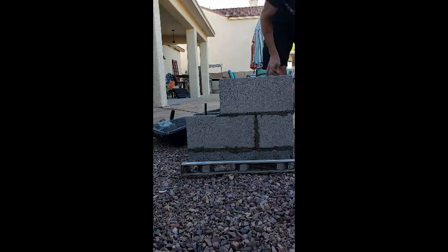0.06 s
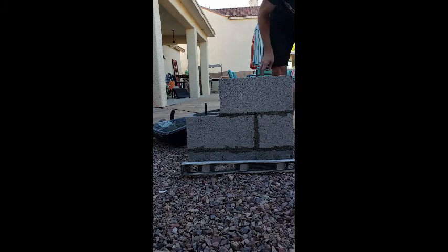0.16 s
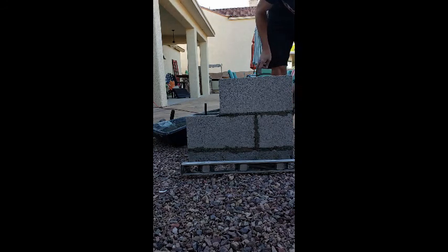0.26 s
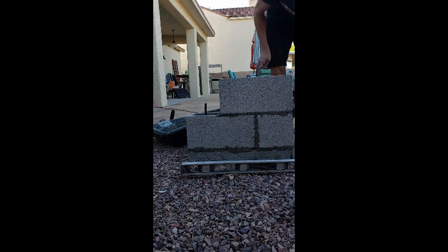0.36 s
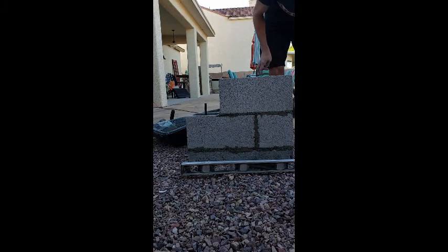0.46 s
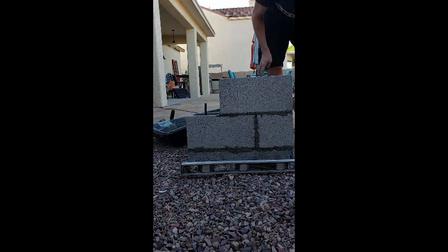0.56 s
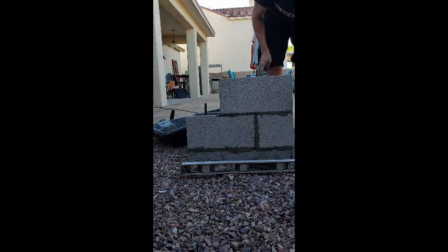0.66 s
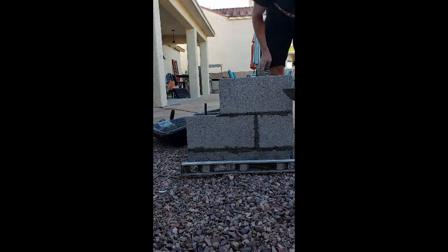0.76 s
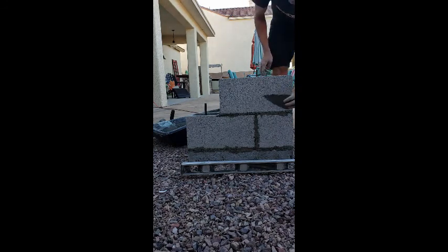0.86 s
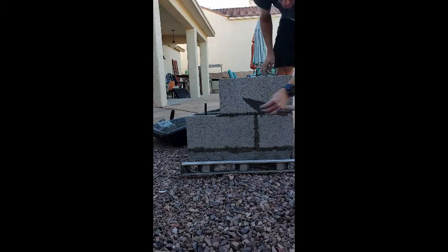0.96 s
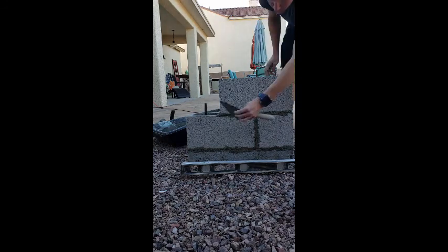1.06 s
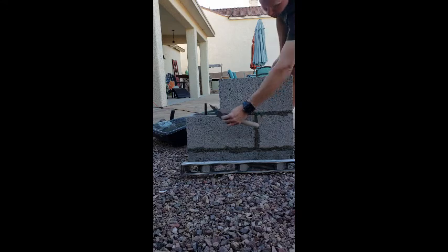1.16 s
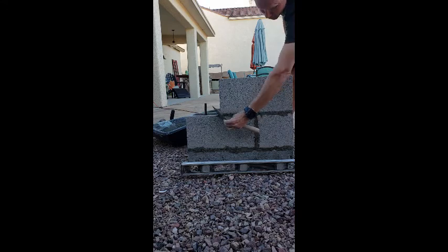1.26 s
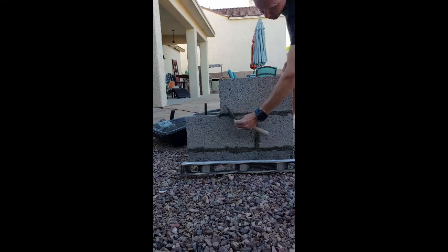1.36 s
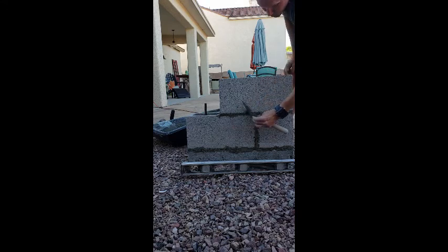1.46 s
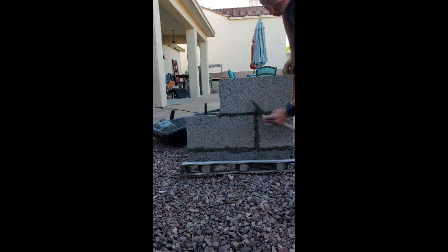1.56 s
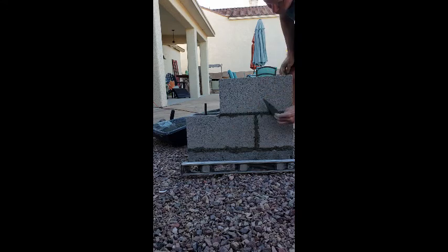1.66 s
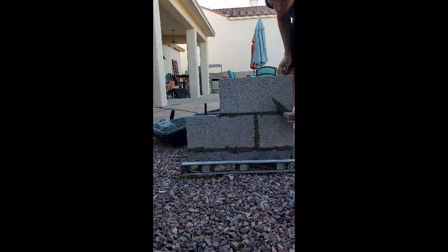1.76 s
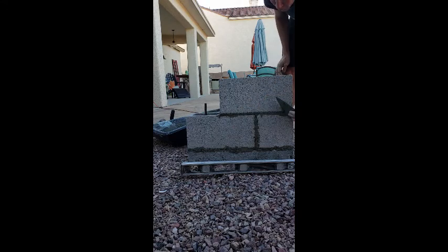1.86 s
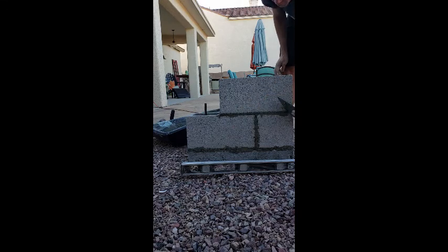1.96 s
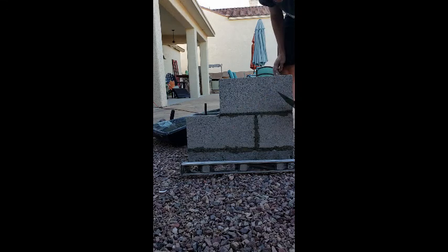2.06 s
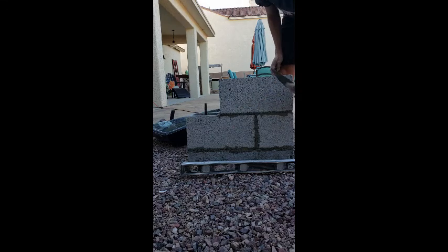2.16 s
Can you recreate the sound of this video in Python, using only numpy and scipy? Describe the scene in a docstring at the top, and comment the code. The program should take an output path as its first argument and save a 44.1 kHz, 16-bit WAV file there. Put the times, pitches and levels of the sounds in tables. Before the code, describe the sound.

A steel trowel rasps twice along gritty mortar between hollow concrete blocks in a quiet yard

```python
"""In a yard, a steel trowel is drawn twice along a mortar joint in a low wall of hollow concrete blocks.
Sand grains rasp under the blade: random clicks and hiss, bunched by stick-slip, drive its resonances.
Where the blade digs in, it judders and coarse slips ring the hollow blocks; decaying noise bursts make
the knocks of the blade and the ticks of mortar crumbs between the strokes.
The house walls return a short echo, as decaying noise, over faint outdoor air and a hum of two sines."""
import sys
import numpy as np
from scipy import signal
from scipy.fft import rfft, irfft
from scipy.io import wavfile

SR = 44100
rng = np.random.default_rng(int(sys.argv[2]) if len(sys.argv) > 2 else 0)


def waveform_to_disk(signal):
    """Save audio, clipped to [-1, 1], as 16-bit WAV at the path in sys.argv[1]."""
    frames = np.transpose(np.atleast_2d(signal))
    scaled = np.clip(frames, -1, 1) * 32767
    samples = np.round(scaled).astype(np.int16)
    wavfile.write(sys.argv[1], SR, samples)


N = 99225
TIME = np.arange(N) / SR
SIZE = 2 ** 17  # FFT length, longer than the scene
HZ = np.fft.rfftfreq(SIZE, 1 / SR)

# short pushes of the first stroke: start t/s, length t/s, level/dB, swell over the push/dB,
# pitch of the flexed blade f/Hz
FIRST_PUSHES = [(0.161,0.0091,-36,4,2350),(0.175,0.04,-36.5,9,2517),(0.221,0.061,-28.5,-1,2482),(0.284,0.0489,-29.5,-10.5,2399),(0.346,0.0206,-34.5,3.5,2184),(0.373,0.0147,-27,-1.5,2325),(0.391,0.0295,-27,-2.5,2494),(0.438,0.0161,-29,2,2420),(0.461,0.0145,-31,4.5,2476),(0.477,0.037,-29,-4,2436),(0.523,0.03347,-21,-2,2495),(0.584,0.035,-21,2.5,2476)]
# the blade knocks or catches on a coarse grain: t/s, level/dB, decay time constant/s
CATCHES = [(.1245,-30.5,0.01726),(.289,-22.5,0.003),(.4805,-15,0.00325),(.9085,-38,0.00395),(1.558,-19,0.00426),(1.591,-17.5,0.0039),(1.612,-17.5,0.0049),(1.739,-25.5,0.0038),(1.75,-21.5,0.00114),(1.811,-21,0.00395),(1.861,-24.5,0.00546),(2.005,-31,0.0054),(2.026,-36.5,0.0057)]
# likeness of left and right under the blade: f/Hz, correlation (0-1)
RASP_ALIKE = [(1300,1),(2400,0.786),(5000,0.515)]
# left minus right in the first and second stroke: f/Hz, level difference/dB
FIRST_SIDE = [(950,-1),(1800,-1.5),(2450,-5),(4300,0),(5300,-2.5),(7200,3),(9500,0.15),(12300,-8),(15500,1)]
SECOND_SIDE = [(1100,2),(2600,-2.5),(4100,1),(5000,-1),(7500,5),(10000,2),(12000,-5.5),(15500,2)]

SECOND_TURN_S = (1.33, 1.439, 1.58, 1.76)  # when the second stroke reaches each colour
DIG_SAND = dict(per_s=1500, spread_db=1.88, hiss_share=0.287, slip_db=0.963, slip_hz=118)
LEFT_LEAD_S = .00007


def rasp():
    """Friction noise: sand under the steel in two firm strokes and a light brush between them."""
    return first_stroke() + second_stroke()


def first_stroke():
    """Pressure-modulated friction: short pushes on fine sand, then a light brush of the blade."""
    # colour of the rasp early and late in the stroke: f/Hz, relative level/dB
    early_colour = [(100,-21.5),(330,-8),(520,-8.5),(730,-14),(940,1),(1200,-21),(1450,-5.5),(1950,-6.5),(2700,-4.5),(3400,-0.5),(3750,-6.5),(5300,-4),(6200,-9.5),(7200,-4),(8800,-12.5),(12600,1),(14200,-1),(16000,-15)]
    late_colour = [(100,-25),(400,-8),(1400,-2),(2000,-7),(3100,-7.5),(3700,-5.5),(5000,-3),(6100,-9),(7400,-5.5),(8600,-8),(10500,-9),(12000,4),(13300,0),(16000,-13)]
    # light brush between the strokes: t/s, level/dB
    brush_level = [(.82,-64),(.885,-51.5),(.91,-40.5),(.935,-58),(.975,-52),(1.02,-65.5)]
    # colour of the brush: f/Hz, relative level/dB
    brush_colour = [(530,-27.5),(900,-3.5),(3400,-3),(8550,-19),(12900,-8),(16000,-21)]
    grit = sand(per_s=8000, spread_db=1.85, hiss_share=0.495, slip_db=1.49, slip_hz=590)
    drag = travel(grit * pushes(FIRST_PUSHES), (0.4137, 0.526), [early_colour, late_colour])
    brush_grit = sand(per_s=760, spread_db=2.91, hiss_share=0.305, slip_db=2.2, slip_hz=170)
    brush = colour(brush_grit * level(brush_level), brush_colour)
    return pair(flex(drag) + brush, RASP_ALIKE, FIRST_SIDE, LEFT_LEAD_S)


def second_stroke():
    """Sustained friction: one pressure curve drives fine sand and resonant coarse grit alike."""
    # level of the long stroke: t/s, level/dB
    stroke_level = [(1.25,-52),(1.35,-31),(1.45,-25.5),(1.53,-25.5),(1.605,-22),(1.635,-24),(1.77,-24.5),(1.85,-31),(1.89,-38.5),(2.0,-43),(2.05,-65.5)]
    # stutter as the pressure eases: start t/s, length t/s, level/dB, swell over the push/dB
    stutter = [(1.68,0.0108,-27.5,-3),(1.771,0.0051,-24,0.5),(1.858,0.00794,-22.5,1.5),(1.922,0.0123,-31,-5.5),(1.96,0.01015,-26.5,-4.5),(1.987,0.0097,-31.5,-4.5)]
    # colour of the rasp at its start, early and late: f/Hz, relative level/dB
    start_colour = [(100,-17),(950,7),(1130,5),(1310,13),(1700,5),(2400,-6),(3350,-1),(10000,-9.5),(12800,-6.5),(16000,-5.5)]
    early_colour = [(100,-28.5),(350,-14.5),(560,-2),(690,-14),(810,3),(1000,1),(1160,-8),(1310,5),(1600,-1.5),(2120,-6.5),(2700,0),(3350,1.5),(3950,-4),(4120,1.5),(4420,-6.5),(5080,2),(5650,-9.5),(7000,-2.5),(10200,-13),(12500,0.5),(16000,-10.5)]
    late_colour = [(100,-17.5),(330,-6),(520,1.5),(650,-21),(810,-2.5),(990,0),(1170,-4),(1380,6.5),(1650,-7.5),(2150,-6),(2750,5.5),(3350,1.5),(3830,-5),(4250,2),(5200,-1),(5750,-17),(7300,2),(9700,-11),(11800,8),(15000,2.5),(16000,-1)]
    pressure = np.hypot(level(stroke_level), pushes(stutter))
    fine = sand(per_s=6000, spread_db=1.17, hiss_share=0.455, slip_db=1.76, slip_hz=141.5)
    coarse = sand(per_s=400, spread_db=2.8, hiss_share=0.1, slip_db=3.8, slip_hz=66.6)
    drag = fine * pressure + grind(coarse * pressure)
    colours = [start_colour, early_colour, early_colour, late_colour]
    return pair(travel(drag, SECOND_TURN_S, colours), RASP_ALIKE, SECOND_SIDE, lead_s=.00004)


def sand(per_s, spread_db, hiss_share, slip_db, slip_hz):
    """Shot noise: clicks of crushed grains over a fine hiss, bunched by the blade's stick and slip."""
    slip = drift(slip_hz)
    sizes = amp(spread_db * np.minimum(rng.exponential(1, N), 4))
    struck = rng.random(N) < per_s / SR
    grains = unit(sizes * struck * rng.standard_normal((2, N)))
    hiss = rng.standard_normal((2, N))
    # the share divides power, not amplitude
    mix = np.sqrt(1 - hiss_share) * grains + np.sqrt(hiss_share) * hiss
    return unit(mix * amp(slip_db * slip))


def pushes(rows):
    """Force envelope: each push bites quickly, swells or eases, and lets go; powers add."""
    attack_s, release_s = 0.00174, 0.0058
    power = np.zeros(N)
    for start, length, db, swell_db, *_ in rows:
        t = TIME - start
        shape = np.clip(t / attack_s, 0, 1) * np.exp(-np.maximum(t - length, 0) / release_s)
        swell = swell_db * (np.clip(t / length, 0, 1) - .5)
        power += (shape * amp(db + swell)) ** 2
    return np.sqrt(power)


def travel(x, times, colours):
    """Time-varying filtering: one colour fades into the next as the blade moves along the joint."""
    treble = (3000, 16000)  # Hz, the band in which the colours are matched in level
    total = 0
    for share, points in zip(np.eye(len(times)), colours):
        total = total + colour(x * np.interp(TIME, times, share), points, treble)
    return total


def flex(x):
    """Bending resonance: the main resonance of the blade re-forms at a new pitch with each push."""
    start, *_, pitch = np.transpose(FIRST_PUSHES)
    push = np.maximum(np.searchsorted(start, TIME) - 1, 0)
    return x + amp(12.5) * resonate(x, pitch[push], width=95)


def grind(grit):
    """Driven resonance: grit rings blade and block, sliding and wavering as the contact point moves."""
    # resonances under the long stroke: early f/Hz, late f/Hz, width/Hz, level against the grit/dB
    joint_modes = [(952.5,922,94.4,3),(1298,1400,104.8,4),(3310,3350,101,6),(5067,4900,150,3)]
    waver_hz, waver_share, waver_db = 16.9, .022, 3.5  # rms depths in pitch and in level
    total = np.zeros_like(grit)
    for early_hz, late_hz, width, db in joint_modes:
        hz = np.interp(TIME, [SECOND_TURN_S[0], SECOND_TURN_S[-1]], [early_hz, late_hz])
        drive = grit * amp(db + waver_db * drift(waver_hz))
        total += resonate(drive, hz * (1 + waver_share * drift(waver_hz)), width)
    return total


def steel_blade(x):
    """Modal response of a plate: friction and knocks excite the ringing modes of the steel."""
    # modes: f/Hz, width/Hz, level against the rasp that drives them/dB
    blade_modes = [(3450,70,-9),(4130,14,-19.5),(5038,69,-10.5),(11830,74,-1.5),(13100,50,-10)]
    return ring(x, blade_modes)


def catches():
    """Impact noise: the blade knocks or catches on coarse grains."""
    # colour of the knocks: f/Hz, relative level/dB
    knock_colour = [(150,-7.5),(400,-4),(2450,-2),(4900,-2),(6100,-10.5),(7200,-8.5),(9500,-18.5),(12200,-0.5),(16000,-3)]
    return snaps(CATCHES, knock_colour, SECOND_SIDE)


def touch():
    """Free vibration: the blade, still free, rings briefly as it first meets the block."""
    # ring at first contact: f/Hz, level/dB, t60/s
    touch_modes = [(348,-51,.1),(1033,-42,0.11),(1848,-42.5,0.086),(2171,-36,.04)]
    t = np.maximum(TIME - CATCHES[0][0], 0)
    return sum(amp(db - 60 * t / t60) * np.sin(2 * np.pi * hz * t) for hz, db, t60 in touch_modes)


def judder():
    """Cavity resonance: the blade digs in and its coarse slips ring the hollow blocks."""
    # level of the first dig: t/s, level/dB
    dig_level = [(.47,-48.5),(.489,-30.5),(.52,-25),(.532,-25.5),(.554,-20),(.572,-23.5),(.592,-25.5),(.622,-25),(.64,-39.5)]
    # colour of its judder: f/Hz, relative level/dB
    hollow_colour = [(120,-30),(390,-21),(470,-8.5),(530,4),(625,-7),(725,-4),(800,-8),(1060,-7),(1250,-17),(1450,-14),(1800,-25.5),(3000,-37)]
    # block cavities that ring on after the first stroke: f/Hz, width/Hz, level against the judder/dB
    cavities = [(533,8,-4),(712.2,12,0.5),(1005.9,8,1),(1331,7,6)]
    # left minus right: f/Hz, level difference/dB
    dig_side = [(250,0.5),(550,-1.5),(950,-2.5)]
    # likeness of left and right: f/Hz, correlation (0-1)
    dig_alike = [(550,1),(1200,0.73),(3000,0.403)]
    slips = colour(sand(**DIG_SAND) * level(dig_level), hollow_colour)
    return pair(ring(slips, cavities) + scoop(), dig_alike, dig_side, lead_s=0.0002023)


def scoop():
    """Gliding resonance: in the second dig two hollow tones draw together as the blade sinks in."""
    # level of the second dig: t/s, level/dB
    dig_level = [(1.18,-59),(1.2,-39.5),(1.21,-29),(1.238,-25.5),(1.255,-22.5),(1.264,-22.5),(1.277,-28.5),(1.298,-24),(1.32,-31.5),(1.42,-46),(1.88,-54.5),(1.955,-43.5),(2.04,-53.5)]
    # colour of its body: f/Hz, relative level/dB
    hollow_colour = [(120,-20),(330,-23),(720,4),(880,-16),(1320,-16.5),(1700,-5),(2300,-12),(5000,-48.5)]
    # the two hollow resonances: t/s, lower f/Hz, upper f/Hz
    glide_points = [(1.21,483.5,1064),(1.25,555.4,1080),(1.295,590.7,984),(1.34,522.5,928)]
    width_hz = 140
    slips = sand(**DIG_SAND) * level(dig_level)
    s, *glides = np.transpose(glide_points)
    total = amp(-7.5) * colour(slips, hollow_colour)
    for glide, db in zip(glides, (19, 17.5)):
        hz = np.interp(TIME, s, glide)
        # two passes give steeper skirts
        total += amp(db) * resonate(resonate(slips, hz, width_hz), hz, width_hz)
    return total


def crumbs():
    """Impact noise: crumbs of mortar snap off and land."""
    # crumbs: t/s, level/dB, decay time constant/s
    crumb_rows = [(.8115,-41.5,0.007),(.8347,-33.5,0.0048),(.8575,-42.5,0.024),(1.192,-44,0.0074),(1.2485,-27.5,0.00306)]
    # colour of the ticks: f/Hz, relative level/dB
    crumb_colour = [(200,-24.5),(1000,1),(3000,-14.5),(6500,2),(9500,-4),(12500,6.5),(16000,-2)]
    return snaps(crumb_rows, crumb_colour, FIRST_SIDE)


def snaps(rows, spectrum, side):
    """Exponential decay: sudden bursts of noise that die in milliseconds."""
    envelope = np.zeros(N)
    for s, db, decay in rows:
        envelope += amp(db) * (TIME >= s) * np.exp(-abs(TIME - s) / decay)
    return pair(colour(envelope * rng.standard_normal((2, N)), spectrum), RASP_ALIKE, side, LEFT_LEAD_S)


def yard(x):
    """Reverberation by convolution: close scatter from gravel and wall, then the house walls' echo."""
    # reverberation time: f/Hz, t60/s
    yard_t60 = [(150,1.5),(550,0.6443),(1200,0.3728),(7000,0.286),(14000,0.0021)]
    # strength of the echo: f/Hz, level/dB
    yard_db = [(150,-5.5),(550,-10.5),(1200,-6.5),(3000,-14.5),(7000,-14),(14000,-20.5)]
    # likeness of left and right: f/Hz, correlation (0-1)
    yard_alike = [(150,0.553),(500,1),(1200,0.77),(4000,0.12)]
    hz, t, z = signal.stft(rng.standard_normal((2, N)), SR, nperseg=256)
    t60 = read(yard_t60, hz)[:, None]
    decay = amp(read(yard_db, hz)[:, None] - 60 * t / t60)
    per_energy = np.sqrt(2 * np.log(1000) / (t60 * SR))  # equal energy for any t60
    tail = signal.istft(z * decay * per_energy, SR, nperseg=256)[1][:, :N]
    tail = pair(tail, yard_alike) * np.minimum(TIME / 0.0154, 1)  # fades in over 15.4 ms
    near = unit(rng.standard_normal((2, N)) * np.exp(-TIME / 0.0063) * (TIME > .001))
    near = colour(near, [(600, -8.5), (3000, 1.5)]) / np.sqrt(N)
    return signal.fftconvolve(x, tail + amp(-5.5) * near, axes=1)[:, :N]


def background():
    """Stationary noise and pure tones: quiet outdoor air with a distant machine hum."""
    # colour of the air: f/Hz, relative level/dB
    air_colour = [(15,-11),(80,2),(260,-6.5),(550,-8),(1000,-22.5),(1800,-27.5),(4500,-25),(9500,-37),(12400,-24.5),(16000,-37)]
    # likeness of left and right: f/Hz, correlation (0-1)
    air_alike = [(30,0.47),(250,1),(1000,0.68),(4000,0.18)]
    # hum: f/Hz, rms level/dB
    hum_tones = [(57,-60.5),(96,-66)]
    air = pair(colour(rng.standard_normal((2, N)), air_colour), air_alike)
    hum = np.zeros(N)
    for hz, db in hum_tones:
        hum += amp(db) * np.sqrt(2) * np.sin(2 * np.pi * (hz * TIME + rng.random()))
    return amp(-55.5) * air + hum


def ring(x, modes):
    """Modal superposition: adds ringing modes to the friction that excites them."""
    response = sum(amp(db) / (1 + 2j * (HZ - hz) / width) for hz, width, db in modes)
    return irfft(rfft(x, SIZE) * (1 + response))[:, :N]


def resonate(x, hz, width):
    """Heterodyning: a resonance of gain 1 follows a frequency curve by filtering at zero frequency."""
    turn = np.exp(2j * np.pi * np.cumsum(hz) / SR)
    r = np.exp(-np.pi * width / SR)
    return 2 * (turn * signal.lfilter([1 - r], [1, -r], x / turn + 1e-18)).real


def drift(hz):
    """Low-passed noise: random wavering of rms 1, mostly slower than the given rate."""
    return unit(irfft(rfft(rng.standard_normal(SIZE)) / (1 + (HZ / hz) ** 4))[:N])


def colour(x, points, band=None):
    """Minimum-phase filter: causal, and it keeps the rms of white noise inside the band."""
    lo, hi = band or (0, SR)
    log_gain = np.log(amp(np.maximum(read(points), -100)))
    mirrored = np.r_[log_gain, log_gain[-2:0:-1]]
    # the Hilbert transform of the log gain supplies the phase
    gain = np.exp(np.conj(signal.hilbert(mirrored))[:len(HZ)])
    gain /= np.sqrt(np.mean(abs(gain) ** 2 * (HZ > lo) * (HZ < hi)))
    return irfft(rfft(x, SIZE) * gain)[..., :N]


def pair(x, alike, side=None, lead_s=0):
    """Interaural-style coherence: sum and difference of two unrelated signals give left and right."""
    a, b = rfft(x, SIZE)
    same = np.clip(read(alike), 0, 1)
    a, b = a * np.sqrt((1 + same) / 2), b * np.sqrt((1 - same) / 2)
    tilt = amp(read(side) / 2) if side else 1
    left = (a + b) * tilt * np.exp(2j * np.pi * HZ * lead_s)
    right = (a - b) / tilt
    # keeps the power of the left-right sum
    norm = np.sqrt((tilt ** 2 + tilt ** -2. + 2 * same) / 4)
    return irfft(np.array([left, right]) / norm)[:, :N]


def amp(db):
    """Decibel law: level to gain."""
    return 10 ** (np.asarray(db) / 20)


def unit(x):
    """Power normalization: scales to rms 1."""
    return x / np.sqrt(np.mean(x ** 2) + 1e-20)


def read(points, hz=HZ):
    """Logarithmic pitch scale: reads a table on a log-frequency axis."""
    f, value = np.transpose(points)
    return np.interp(np.log(hz + 1), np.log(f + 1), value)


def level(points):
    """Level envelope: gain over time from a dB curve, -120 dB outside it."""
    s, db = np.transpose(points)
    return amp(np.interp(TIME, s, db, left=-120, right=-120))


def scene():
    """Superposition: direct sound of the trowel work, its echo in the yard and the background."""
    steel = steel_blade(rasp() + catches()) + touch()
    work = steel + judder() + crumbs()
    return work + yard(work) + background()


def record(dry):
    """Band limitation: a linear-phase low-pass at 16.05 kHz."""
    low_pass = signal.firwin(511, 16050, window=("kaiser", 8), fs=SR)
    return signal.oaconvolve(dry, low_pass[None], "same")


dry = scene()
out = record(dry)
waveform_to_disk(out)
```